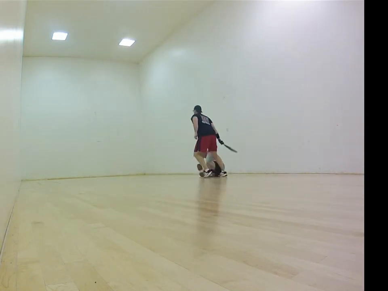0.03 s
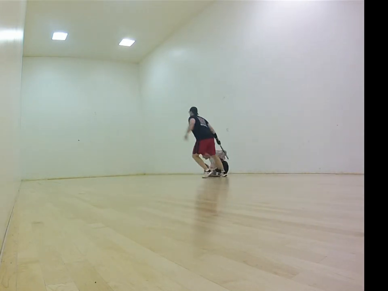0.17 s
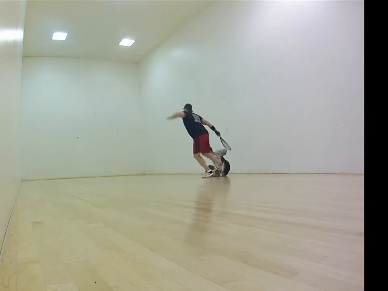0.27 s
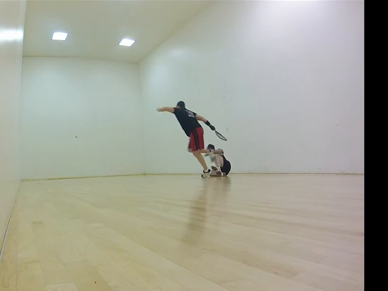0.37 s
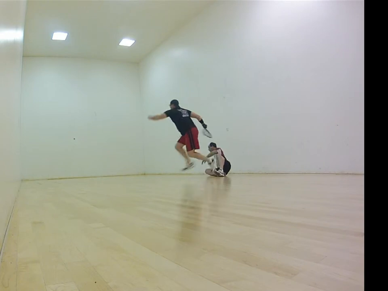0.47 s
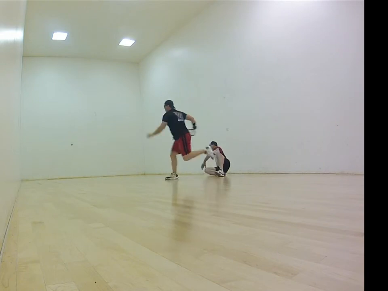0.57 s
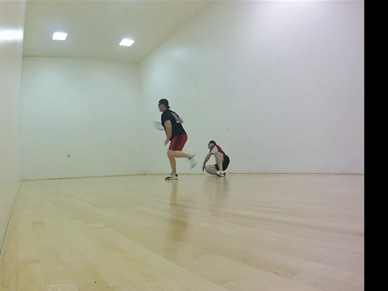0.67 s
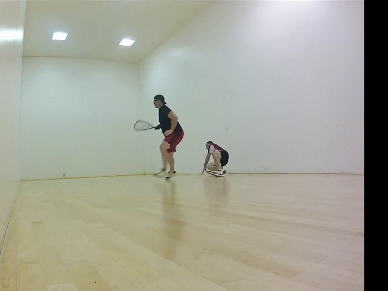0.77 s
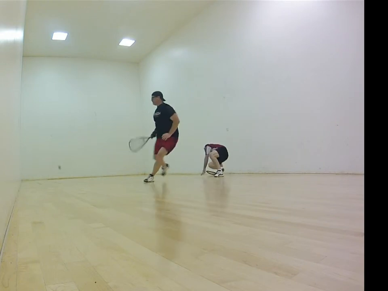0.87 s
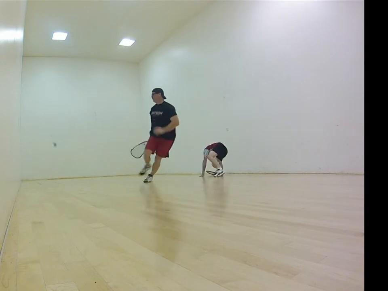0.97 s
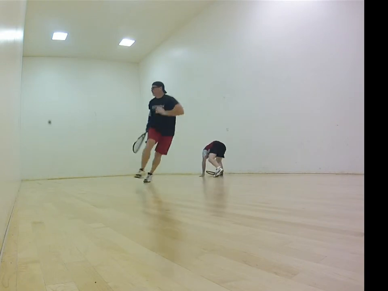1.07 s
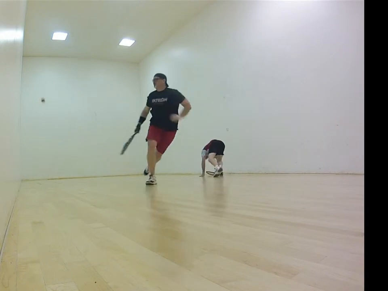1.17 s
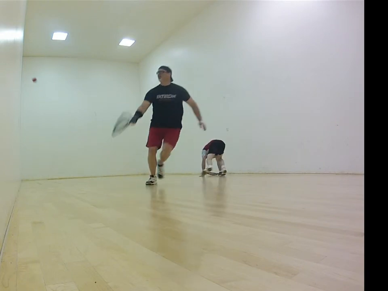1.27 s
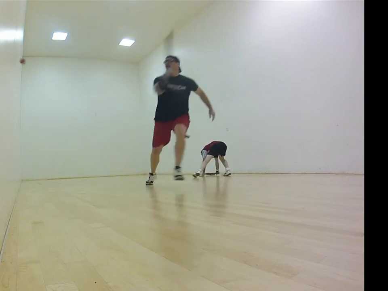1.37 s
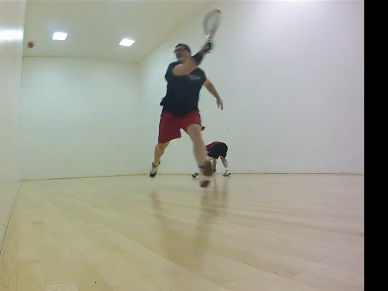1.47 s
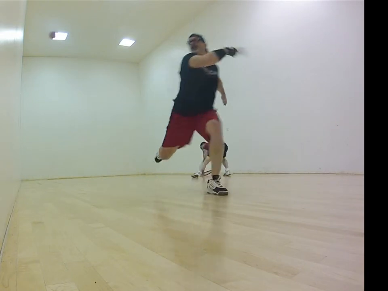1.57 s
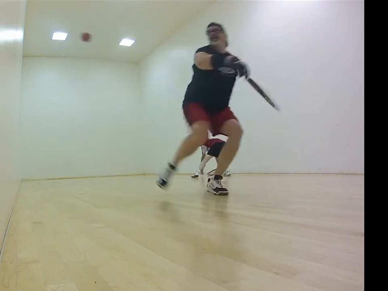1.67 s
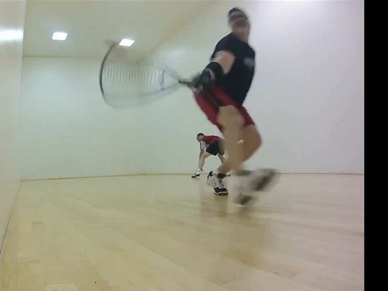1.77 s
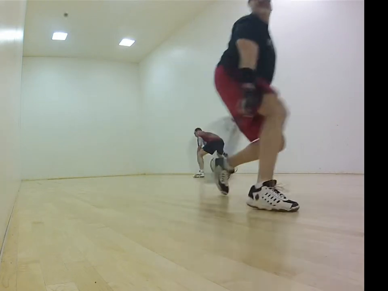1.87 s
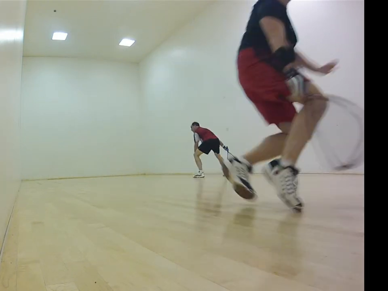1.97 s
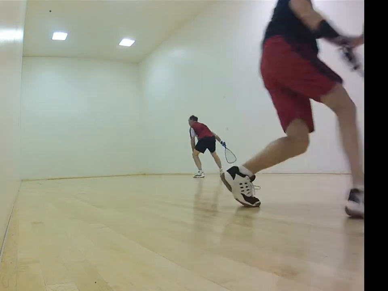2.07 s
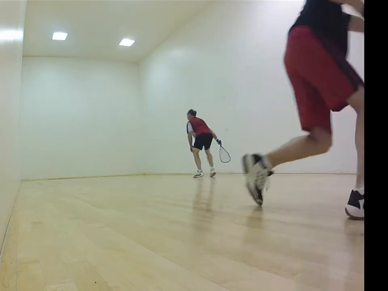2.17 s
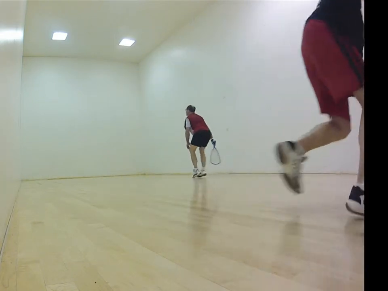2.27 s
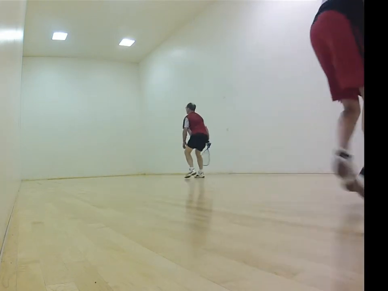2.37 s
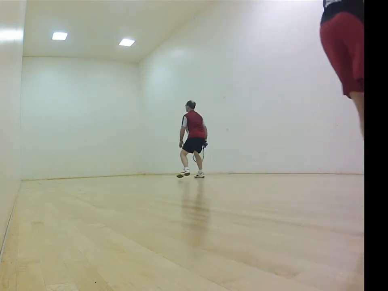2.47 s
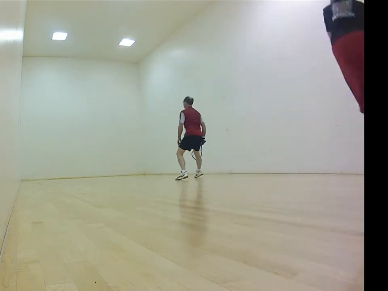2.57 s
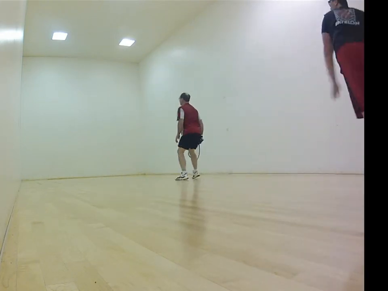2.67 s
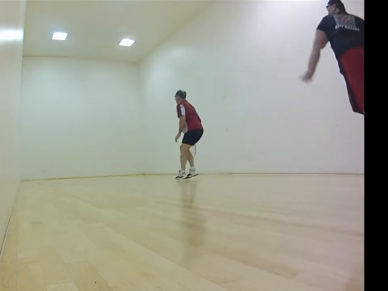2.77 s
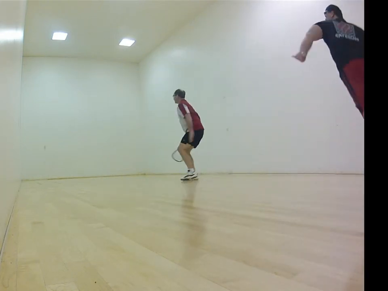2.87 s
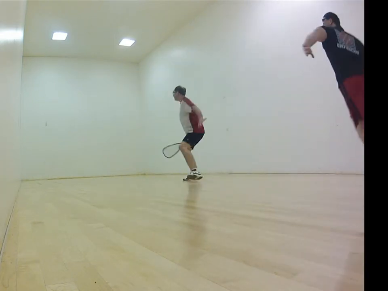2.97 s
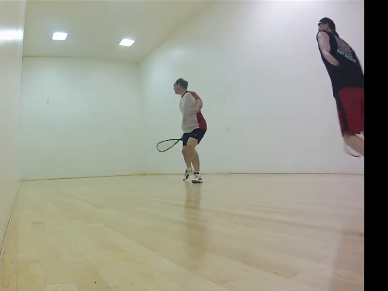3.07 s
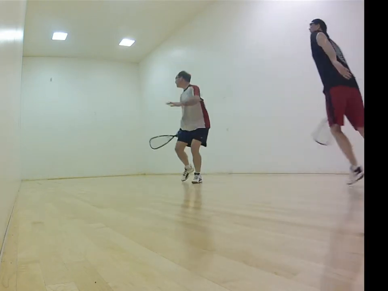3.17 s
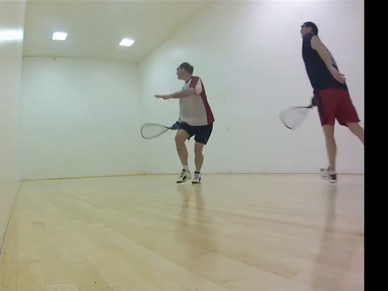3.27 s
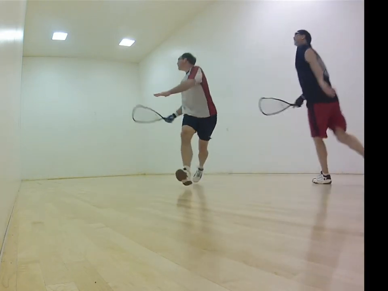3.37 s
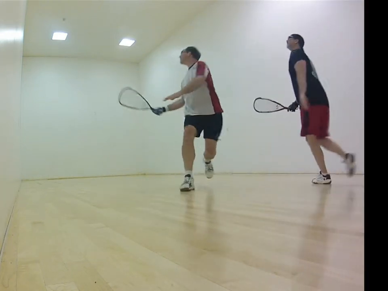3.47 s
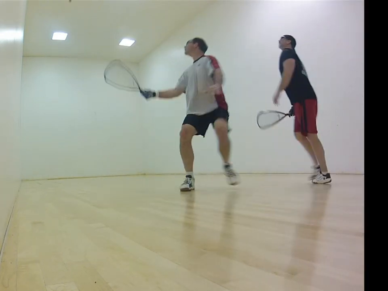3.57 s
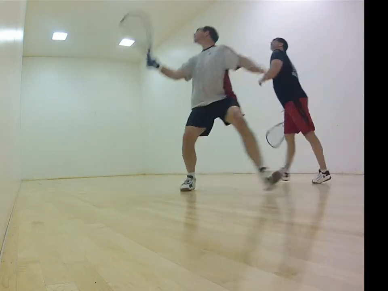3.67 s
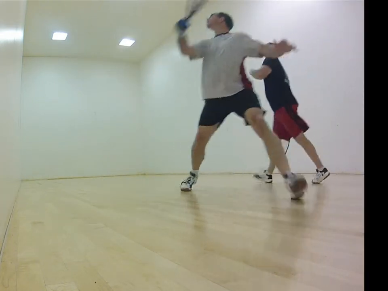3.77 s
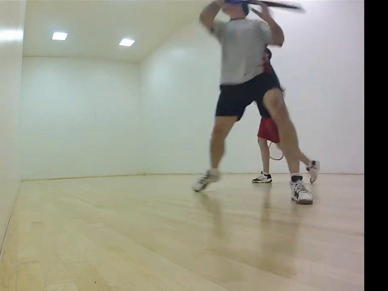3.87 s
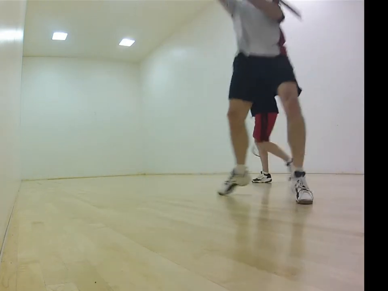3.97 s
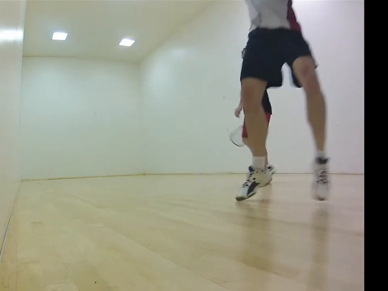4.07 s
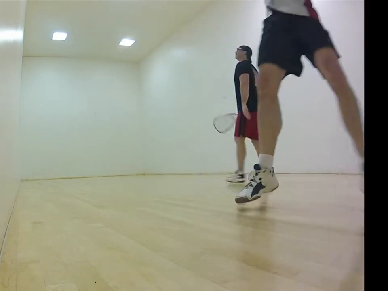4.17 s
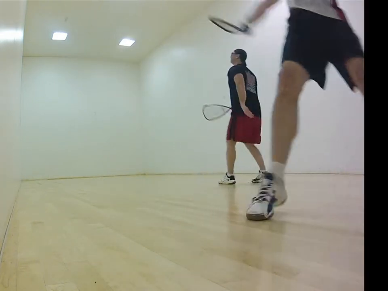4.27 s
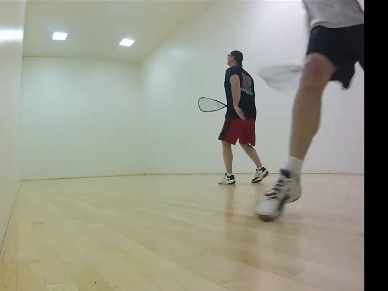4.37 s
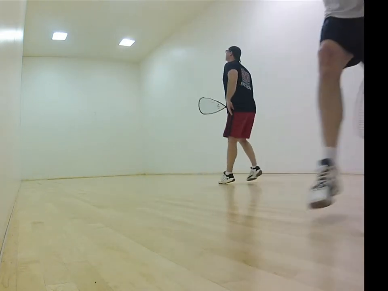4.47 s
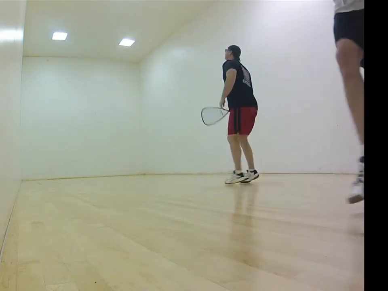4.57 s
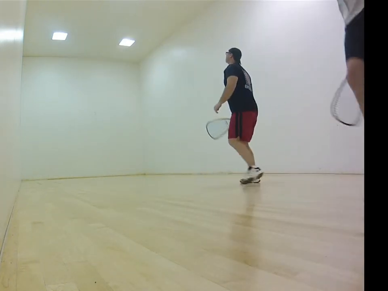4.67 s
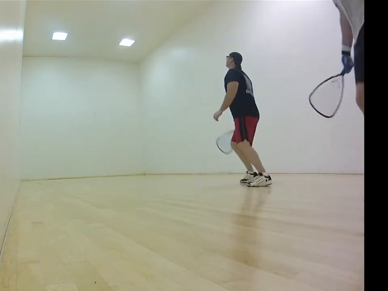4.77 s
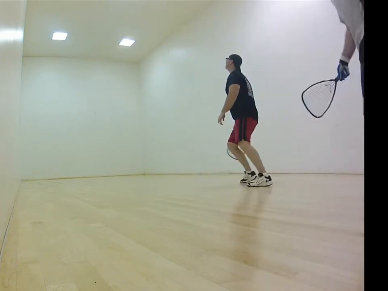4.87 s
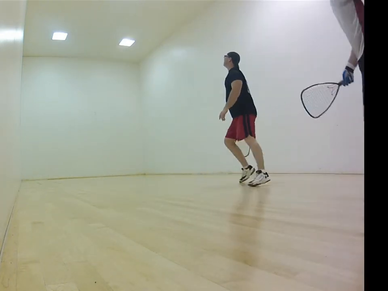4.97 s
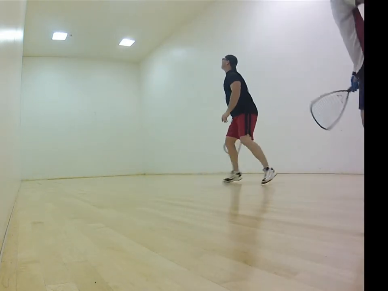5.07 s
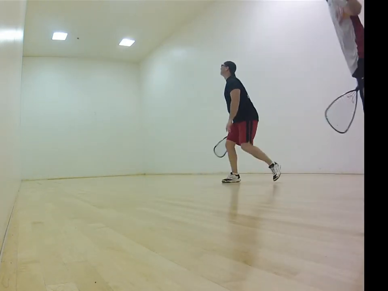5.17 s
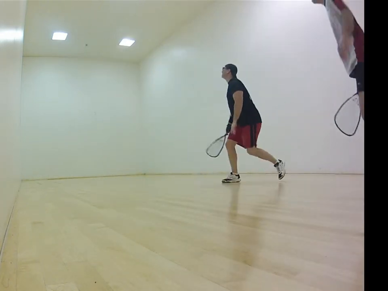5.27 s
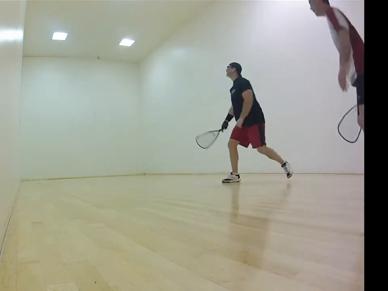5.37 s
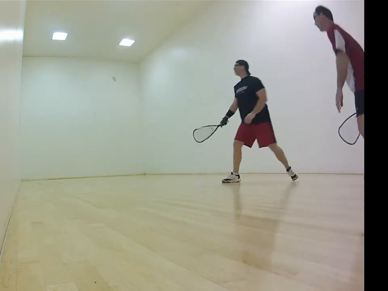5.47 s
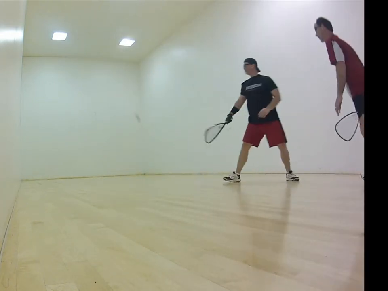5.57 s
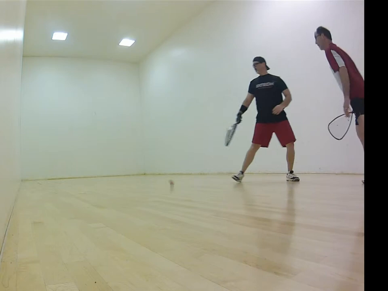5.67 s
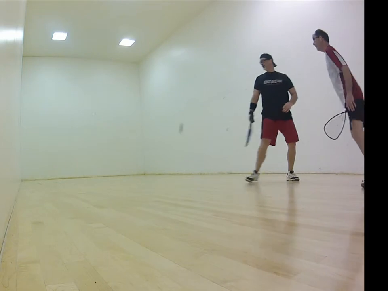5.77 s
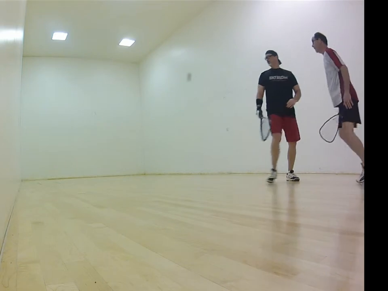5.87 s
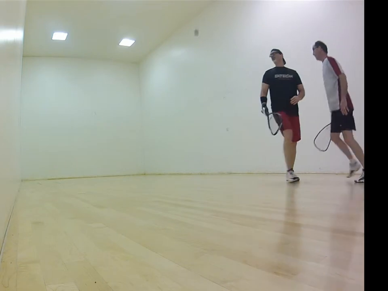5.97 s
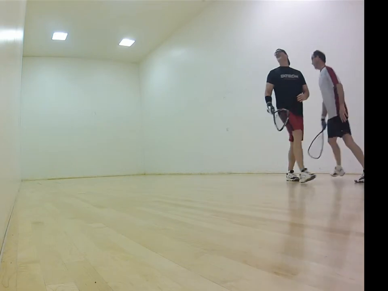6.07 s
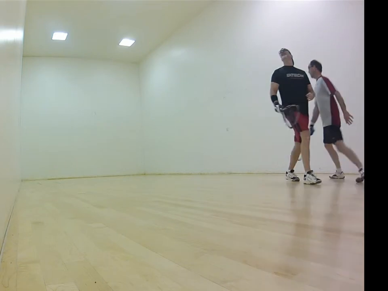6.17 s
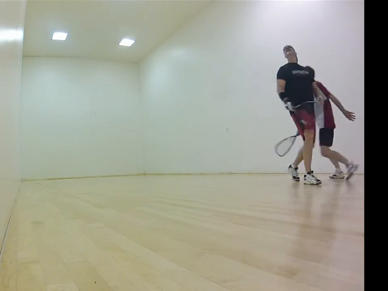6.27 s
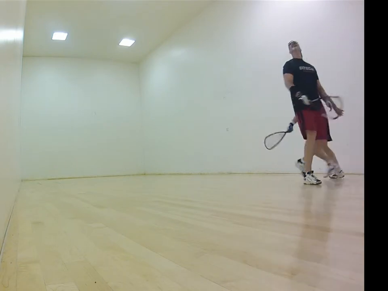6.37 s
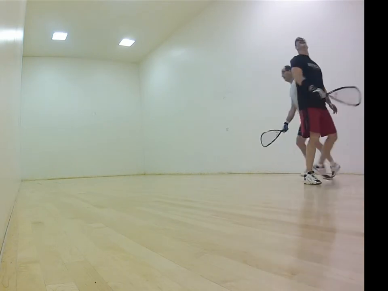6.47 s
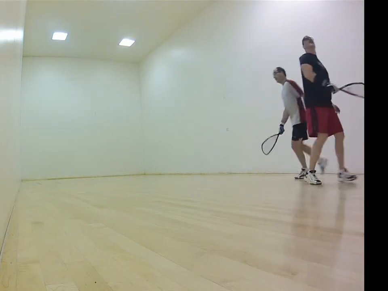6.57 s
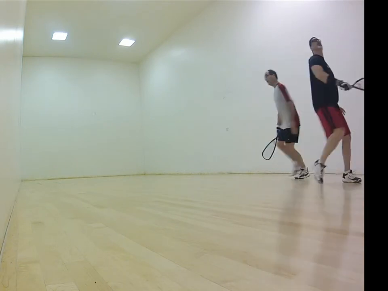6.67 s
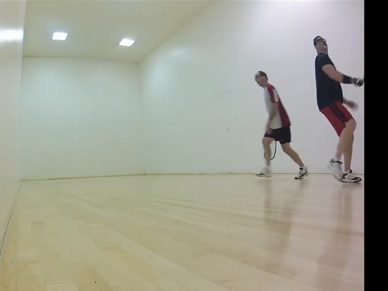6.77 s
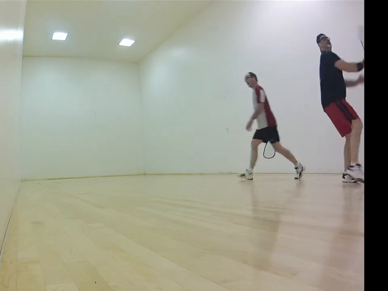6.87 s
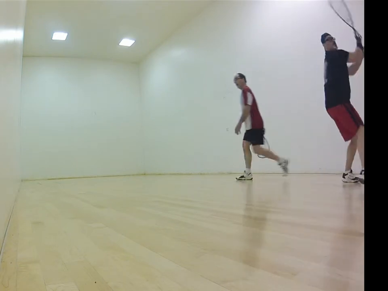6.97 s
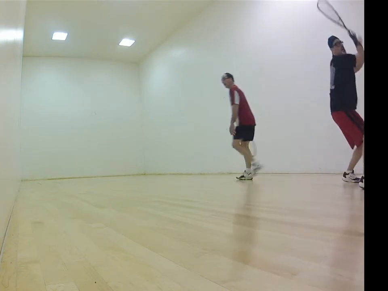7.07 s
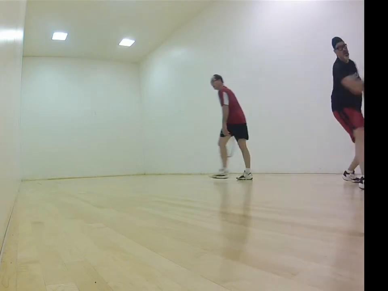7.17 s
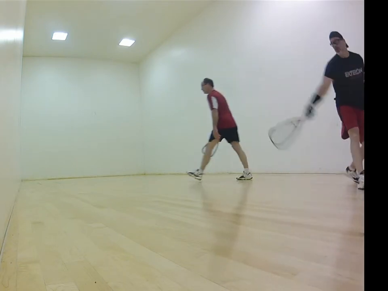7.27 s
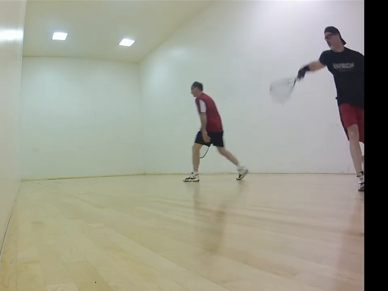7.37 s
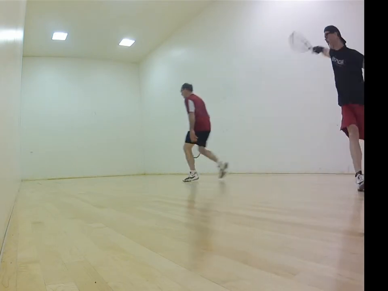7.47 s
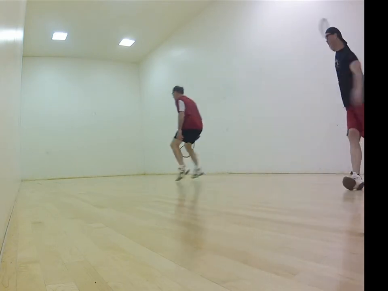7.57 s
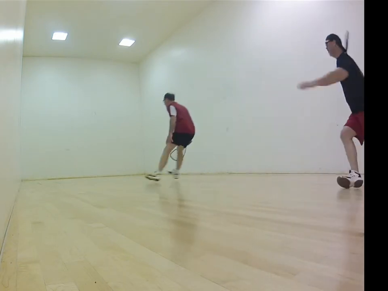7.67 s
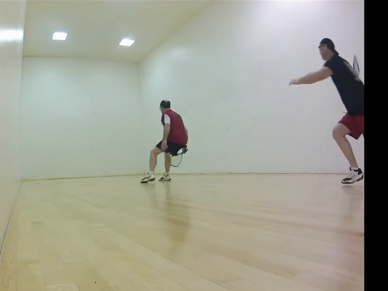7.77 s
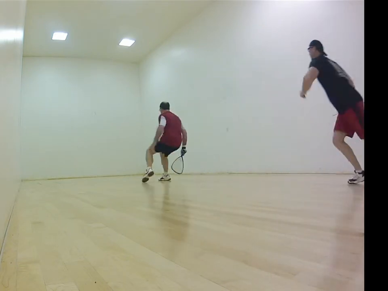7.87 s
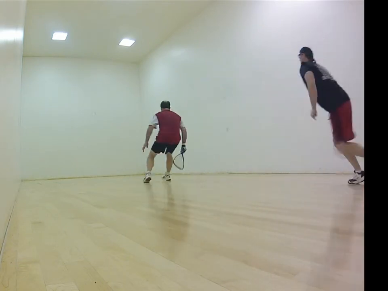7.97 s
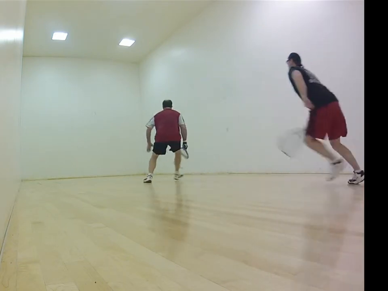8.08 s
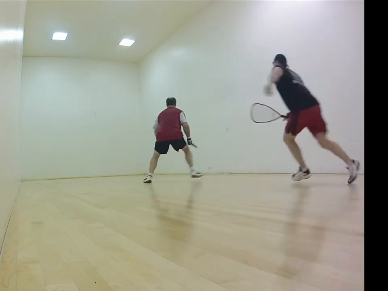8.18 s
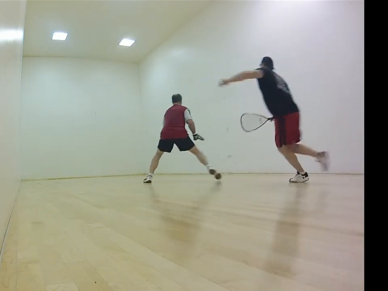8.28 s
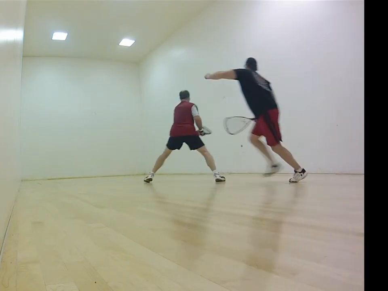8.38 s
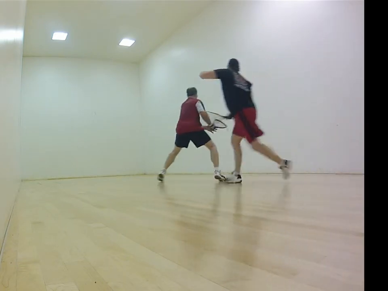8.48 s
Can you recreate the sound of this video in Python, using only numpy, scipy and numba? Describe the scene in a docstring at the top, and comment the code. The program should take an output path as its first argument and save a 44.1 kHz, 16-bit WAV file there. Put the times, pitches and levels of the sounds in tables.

```python
"""A hollow rubber ball pings off racquets, walls and floor in a rally on a bare, very live court.
Each impact excites the ball's air cavity and shell. Footfalls drive the sprung boards, soles squeak by
stick-slip friction, wooden panels boom and racquets swish, over the low noise of the ventilation.
Every blow reverberates for about three seconds. A small camera on the floor picks it up: its gain
ducks after loud blows, it overloads, and its slow converter mirrors the sound into the treble."""
import sys
import numpy as np
from scipy import signal
from scipy.fft import rfft, irfft, next_fast_len
from scipy.io import wavfile
from numba import njit

SR = 44100
rng = np.random.default_rng(int(sys.argv[2]) if len(sys.argv) > 2 else 0)


def put_to_file(sound):
    """Save the sound as 16-bit audio at rate SR, in the file named by the first command-line argument."""
    columns = np.atleast_2d(sound).T  # one column per channel
    safe = np.clip(columns, -1, 1)
    whole_steps = np.round(safe * 32767)
    wavfile.write(sys.argv[1], SR, whole_steps.astype(np.int16))


N = 376605


def from_db(db):
    """Amplitude ratio of a level in decibels."""
    return 10 ** (np.asarray(db) / 20)


def seconds(length_s):
    """A uniformly sampled time axis."""
    return np.arange(int(length_s * SR)) / SR


def decay(t, t60_s):
    """Exponential damping: 60 dB are lost in t60_s."""
    return np.exp(-np.log(1000) * t / t60_s)


def mode(t, hz, t60_s):
    """Impulse response of a damped harmonic oscillator."""
    return np.sin(2 * np.pi * hz * t) * decay(t, t60_s)


def on_bins(hz, values, size):
    """A curve interpolated over log frequency onto the bins of a Fourier transform."""
    bins_hz = np.maximum(np.fft.rfftfreq(size, 1 / SR), 1)
    return np.interp(np.log(bins_hz), np.log(hz), values)


def coloured_noise(spectrum, size):
    """Spectral shaping: white noise filtered by (frequency_hz, level_db) points, scaled to rms 1."""
    padded = next_fast_len(size)
    gain = from_db(on_bins(*np.transpose(spectrum), padded))
    noise = irfft(rfft(rng.standard_normal(padded)) * gain, padded)[:size]
    return noise / noise.std()


# spectrum of the ball's crack and the soles' slap and rub: frequency_hz, level_db
CONTACT_SPECTRUM = [(300, -13), (1000, 10.5), (1700, 1), (2200, 2.5), (3000, 3), (4000, 3.5), (5500, -6.5)]

def contact_noise(envelope):
    """Broadband contact noise: a burst is whitened to remove chance pitches, then coloured."""
    size = len(envelope)
    noise = rng.standard_normal(size) * envelope
    for _ in range(4):
        bins = rfft(noise, 2 * size)
        noise = irfft(bins / (np.abs(bins) + 1e-12))[:size]
    colour = from_db(on_bins(*np.transpose(CONTACT_SPECTRUM), 2 * size))
    noise = irfft(rfft(noise, 2 * size) * colour)[:size]
    return noise * np.linalg.norm(envelope) / np.linalg.norm(noise)


def cavity_ping(t, cavity_hz, hardness_db, squash=0.11, rebound_s=0.0037, lag_s=0.0012):
    """Cavity resonance: the pitch rises as the ball springs back; a hard blow chokes it sooner."""
    pitch_hz = cavity_hz * (1 - squash * np.exp(-t / rebound_s))
    phase = 2 * np.pi * np.cumsum(pitch_hz) / SR
    swell_s = 0.0023 * 2 ** (-hardness_db / 35.5)
    progress = np.maximum(t - lag_s, 0) / swell_s
    envelope = (progress * np.exp(1 - progress)) ** 3
    overtone = from_db(-26 + .5 * hardness_db) * np.sin(1.962 * phase)
    return from_db(-4.5) * envelope * (np.sin(phase) + overtone)


# the ball's higher shell modes: frequency_hz, level_db, t60_s
SHELL_MODES = [(937, -11, 0.017), (2265, -25, 0.01), (2800, -28, 0.022)]
# ball hits, and stray pings that stand out of the court's echo:
# start_s, level_db, distance_m, cavity_hz, hardness_db
BALL_PINGS = [(-0.3, 16.5, 5.5, 787, -2.5), (0.1245, 7.5, 3.4, 825, 6.5), (0.141, 11, 6.7, 656, 11.5),
              (0.277, 13.5, 14, 834, 1.5), (0.356, 7, 2.8, 894, -10), (0.54, 7.5, 20, 640, -2),
              (0.648, 9, 4.7, 605, -13), (0.664, 16, 15, 700, -7), (0.895, 6, 3, 743, -12),
              (0.962, 5, 4.1, 658, -35), (1.251, 2, 3.6, 697, -32), (1.859, 10.5, 3.6, 724, -18.5),
              (2.0, 2, 3.5, 933, -5), (2.08, 10, 33, 866, -4.5), (2.163, 10, 23, 677, 5),
              (2.64, 5, 5.9, 830, -1.5), (2.88, 5, 4.6, 880, -3.5), (4.185, 11.5, 1, 812, -7),
              (4.252, 6.5, 16, 806, -6.5), (4.315, 7.5, 13, 873, -8.5), (4.42, 6, 4.4, 715, -8),
              (4.597, 6.5, 4.3, 833, -12), (4.7305, 18.5, 2.44, 844, -12.5), (4.765, 12, 6, 760, -9),
              (4.985, 5, 9.5, 750, -3.5), (5.2135, -1, 2.4, 770, -13), (5.2995, -0.5, 1.3, 750, -14),
              (5.7918, 6, 1.75, 902, -10.5), (5.97, 8, 16, 905, -6), (6.0, -2, 4.9, 629, -30),
              (7.3308, 17, 0.67, 810, -0.5), (7.395, 15, 3.5, 823, 1), (7.465, 13, 10, 855, -3.5),
              (7.5585, 15, 7.2, 703, -3), (7.6095, 6.5, 1.8, 820, -7), (7.772, 14, 2.1, 884, -19),
              (7.878, 7, 2.8, 892, -18), (8.055, 8, 9.8, 694, 1), (8.427, 0.5, 2.3, 855, -3)]

def ball_ping(cavity_hz, hardness_db):
    """Elastic impact excites shell and cavity; a harder blow loads faster, thumps and cracks more."""
    t = seconds(0.26)
    thump = from_db(1.5 + 0.51 * hardness_db) * mode(t, hz=285, t60_s=0.013)
    wobble = from_db(-6) * mode(t, hz=600, t60_s=0.0085)  # the rubber wall swings in and out
    ping = cavity_ping(t, cavity_hz, hardness_db)
    shell = sum((-1) ** k * from_db(db) * mode(t, hz, t60_s)
                for k, (hz, db, t60_s) in enumerate(SHELL_MODES))
    crack = 0.26 * from_db(hardness_db) * contact_noise(decay(t, t60_s=0.016))
    contact_s = 0.00086 * 2 ** (-hardness_db / 47)
    loading = 1 - np.exp(-(t / contact_s) ** 2)
    return (thump + wobble - ping + shell + crack) * loading


# thuds on the floorboards, mostly steps, and a stomp's quick echoes:
# start_s, level_db, distance_m, board_hz, slap_db
FLOOR_THUDS = [(-0.2, 7, 6, 175, -6), (0.22, 10, 14, 192, -5), (0.6635, 7.5, 1.7, 193, -11),
               (0.691, 1, 2.3, 144, -22), (0.716, -8, 0.78, 174, -28), (0.775, 4.5, 2.7, 153, -26),
               (0.812, -2, 1.05, 157, -32), (1.609, -0.5, 2.9, 187, -15), (1.638, 1, 1.03, 135, -11),
               (1.677, -3, 2, 133, -31), (1.712, -8, 3.1, 133, -15), (1.8585, 2, 0.51, 255, -9),
               (1.9185, 1, 0.44, 187, -11), (2.09, 10, 30, 171, -31), (2.1735, -3.5, 0.69, 233, -21),
               (2.305, 4.5, 1.8, 160, -26), (2.338, -8, 1.6, 149, -28), (2.36, -4, 3, 66, -28),
               (2.405, -2.5, 2.2, 98, -20), (2.655, 3.5, 9.5, 211, -34), (2.95, -2.5, 2.3, 279, -15),
               (3.552, -3.5, 1.9, 90, -16.5), (3.87, -8, 2.4, 135, -20), (3.9105, 1.5, 1.1, 220, -13),
               (4.32, -21, 4.9, 109, -7), (4.7065, 2.5, 0.67, 249, -8), (4.719, -1, 1.4, 230, -4),
               (5.21, -12, 8, 112.4, -21), (5.7905, -5.5, 0.93, 235, -10), (6.7, -21, 1.3, 175, -16),
               (7.01, -9.5, 3.7, 153, -7), (7.6965, 10, 3.4, 365, -17), (7.71, 10.5, 4.8, 313, -16),
               (7.72, -1.5, 1.3, 189, -20), (7.744, -1.5, 1.4, 240, -14), (7.766, 1, 1.7, 277, -24),
               (7.877, 4.5, 9.1, 182, -11), (8.155, -11.5, 0.66, 163, -24)]

def floor_thud(board_hz, slap_db, ordinary_step_hz=198, ring_cycles=4.93, heel_s=0.00087):
    """Damped vibration of sprung boards under a slapping sole; lower thuds boom more and ring longer."""
    t = seconds(0.086)
    boards = mode(t, board_hz, t60_s=ring_cycles / board_hz)
    knock = from_db(-8) * mode(t, hz=430, t60_s=0.014)
    octaves = np.log2(board_hz / ordinary_step_hz)
    boom = from_db(-9.5 - 15.5 * octaves) * mode(t, hz=66, t60_s=0.019)
    slap = 0.52 * from_db(slap_db) * contact_noise(decay(t, t60_s=0.034))
    loading = 1 - np.exp(-t / heel_s)
    return (2.14 * (boards - knock - boom) + slap) * loading


# relative spectral density of the ventilation: frequency_hz, level_db
VENT_SPECTRUM = [(20, 11), (55, -5), (130, 1.5), (300, -7), (600, -8), (1500, -36), (5000, -55)]

def ventilation(level_db=-26):
    """Stationary noise with most of its power in the bass."""
    return from_db(level_db) * coloured_noise(VENT_SPECTRUM, N)


# rubber soles slipping: start_s, level_db, distance_m, pitch_hz, glide_octaves, roughness (0-1)
SOLE_SLIPS = [(0.165, -5, 6, 2290, -0.99, 0.87), (0.24, -3, 4.2, 3200, 0.36, 0.76),
              (1.426, -19, 6.2, 2680, 0.22, 0.2), (1.427, -17.5, 6, 5010, 0.2, .9),
              (1.449, -26, 5.6, 5070, -.1, .4), (1.465, -19, 3.6, 2740, 0.34, 0.4),
              (2.174, -6, 0.45, 3190, -0.25, 0.46), (2.1785, -7, 0.49, 4090, 0.47, 0.6),
              (2.258, -6.5, 4.6, 4184, 0.24, 0.5), (4.318, -22, 1.5, 4150, -0.31, 0.24),
              (4.7045, -19.5, 0.65, 3580, -0.56, 0.97), (5.1995, -12.5, 5.3, 2990, 0.3, 0.8),
              (6.71, -12, 8.3, 3923, -0.26, 0.2), (6.712, -21, 3.5, 2570, -0.25, 0.23),
              (6.773, -25, 2.1, 2800, 0.2, 0.43), (6.945, -25, 5, 1560, 0.17, .5),
              (7.312, -18, 3.2, 4850, 0, .9), (7.572, -16, 2.8, 4870, 0.72, 0.66),
              (7.581, -12, 2.7, 3000, -0.28, .8), (7.591, -13, 2.4, 4300, -0.32, 0.7),
              (7.608, -20.5, 1.2, 5270, 0, 0.9)]

def squeak(pitch_hz, glide_octaves, roughness, clean_slip_s=0.01277, arch_octaves=0.081):
    """Stick-slip friction gives an arching tone; a rough slip wavers, chatters, rubs and ends sooner."""
    t = seconds(.06)
    jitter_spectrum = [(100, 3.5), (500, 24), (2500, -15.5)]
    waver_octaves = 0.093 * roughness * coloured_noise(jitter_spectrum, len(t))
    grip = coloured_noise(jitter_spectrum, len(t))
    progress = np.minimum(t / clean_slip_s * 2 ** roughness, 1)
    pressure = np.sin(np.pi * progress)  # the sole catches and lets go
    octaves = glide_octaves * (progress - .5) + arch_octaves * (pressure - 1) + waver_octaves
    phase = 2 * np.pi * np.cumsum(pitch_hz * 2 ** octaves) / SR
    tone = np.sin(phase) + from_db(-18) * np.sin(2 * phase)
    chatter = from_db(4 * roughness * (grip - .5))
    rub = from_db(-5) * roughness * contact_noise(pressure)
    return tone * pressure * chatter + rub


# a wooden panel's modes: pitch_ratio, level_db
PANEL_MODES = [(0.83, 0.5), (1, 3), (1.13, -32), (1.28, 4.5), (1.45, -4.5), (1.71, -16)]
# heavy landings and shoves: start_s, level_db, distance_m, t60_s, pitch_hz
PANEL_BLOWS = [(0.664, -15.5, 0.39, 1, 127.3), (1.637, -20.5, 0.5, 0.28, 127),
               (2.3, -18.5, 0.44, 1.6, 134.8), (3.55, -25.5, 1.1, 0.61, 113.2),
               (7.87, -19, 0.64, 1.03, 130)]

def panel_boom(t60_s, pitch_hz, swell_s=0.0031):
    """Modal superposition: a big wooden panel takes the weight and rings in several low modes."""
    t = seconds(.8)
    modes = sum((-1) ** k * from_db(db) * mode(t, ratio * pitch_hz, t60_s)
                for k, (ratio, db) in enumerate(PANEL_MODES))
    return .5 * modes * (1 - np.exp(-t / swell_s))


# racquets sweeping close by: start_s, level_db, distance_m, pitch_hz
RACQUET_SWINGS = [(4.145, -27, 0.99, 486), (7.294, -29, 0.43, 660)]

def racquet_swish(pitch_hz, length_s=0.049, width_octaves=0.38):
    """Aerodynamic noise: air rushes through the strings, louder as the racquet gathers speed."""
    t = seconds(length_s)
    band = [(pitch_hz * 2 ** (widths * width_octaves), db)
            for widths, db in [(-3, -30), (-1, -8), (0, 0), (1, -10), (4, -45)]]
    return coloured_noise(band, len(t)) * np.sin(np.pi * (t / length_s) ** 2)


# the court's reverberation time: frequency_hz, t60_s
COURT_DECAY = [(50, 3.3), (160, 2.44), (400, 3.05), (900, 3.4), (2500, 4.12), (5000, 2.48)]

def court_response(density_per_s3=1.5e6, build_s=0.0068, bunching_db=1.67, flutter_s=.0356):
    """Reverberation: echo density grows with time squared; a flutter runs between floor and ceiling."""
    t = seconds(3)
    echo_chance = np.clip(density_per_s3 * t ** 2 / SR, 1e-4, 1)
    echoes = rng.standard_normal(len(t)) * (rng.random(len(t)) < echo_chance) / np.sqrt(echo_chance)
    bunching = coloured_noise([(15, -26), (40, -6), (120, 2.5), (400, -29.5)], len(t))
    echoes *= from_db(bunching_db * bunching)
    onset = 1 - np.exp(-(t / build_s) ** 2)
    spectrum = rfft(echoes * onset)
    centres_hz, t60s = np.transpose(COURT_DECAY)
    bands = [on_bins(centres_hz, weights, len(t)) for weights in np.eye(len(t60s))]
    wash = sum(irfft(spectrum * band, len(t)) * decay(t, t60_s) for band, t60_s in zip(bands, t60s))
    wash /= np.linalg.norm(wash)
    trip = int(flutter_s * SR)
    wash[trip::trip] += 0.073 * decay(t[trip::trip], t60_s=0.26)
    return wash


def in_court(events, source, responses, critical_distance_m=2.19):
    """Inverse distance law: the direct sound equals the reverberant field at the critical distance."""
    lead = SR // 2  # the rally is already under way at time zero
    out = np.zeros(lead + N + 4 * SR)
    for k, (start_s, level_db, distance_m, *shape) in enumerate(events):
        sound = from_db(level_db) * source(*shape)
        heard = signal.oaconvolve(sound, responses[k % len(responses)])
        heard[:len(sound)] += critical_distance_m / distance_m * sound
        start = lead + round(start_s * SR)
        out[start:start + len(heard)] += heard
    return out[lead:lead + N]


def scene():
    """Superposition of ball, floor, soles, panels and racquets over the ventilation."""
    responses = [court_response() for _ in range(10)]  # each spot has its own pattern of echoes
    background = ventilation()
    sources = [(BALL_PINGS, ball_ping), (FLOOR_THUDS, floor_thud), (SOLE_SLIPS, squeak),
               (PANEL_BLOWS, panel_boom), (RACQUET_SWINGS, racquet_swish)]
    rally = sum(in_court(events, source, responses) for events, source in sources)
    return (background + rally)[None]


@njit
def gain_reduction_db(excess_db, attack_s, release_db_per_s):
    """Envelope follower: it chases the excess level quickly and lets go at a steady rate."""
    attack, release = 1 / (attack_s * SR), release_db_per_s / SR
    out, held = np.zeros(len(excess_db)), 0.
    for i in range(len(out)):
        held = max(held + attack * max(excess_db[i] - held, 0.) - release, 0.)
        out[i] = held
    return out


def gain_control(x, threshold_db=-11.5, sense_hz=350, deepest_db=28):
    """Dynamic compression: loud sound is turned down, with the bass heeded less."""
    sensed = signal.sosfilt(signal.butter(2, sense_hz, "high", fs=SR, output="sos"), x)
    level_db = 20 * np.log10(np.abs(sensed) + 1e-9)
    excess_db = np.minimum(level_db - threshold_db, deepest_db)
    return x * from_db(-gain_reduction_db(excess_db, attack_s=0.0024, release_db_per_s=90))


def converter(x, band_hz=5500, rate_hz=12000):
    """Zero-order hold: weaker images of the band appear on both sides of the sampling rate."""
    narrow = signal.sosfilt(signal.butter(24, band_hz, fs=SR, output="sos"), x)
    mirrored = narrow * (1 + 2 * np.cos(2 * np.pi * rate_hz * np.arange(N) / SR))
    padded = next_fast_len(N)
    hold_droop = np.sinc(np.fft.rfftfreq(padded, 1 / SR) / rate_hz)
    return irfft(rfft(mirrored, padded) * hold_droop, padded)[:N]


def record(dry, mic_low_hz=62, cutoff_hz=15300):
    """Band limiting and saturation: the camera loses deep bass, ducks, clips and cuts the top."""
    picked_up = signal.sosfilt(signal.butter(2, mic_low_hz, "high", fs=SR, output="sos"), dry[0])
    overloaded = np.clip(gain_control(picked_up), -1.2, 1.2)
    converted = converter(overloaded)
    soft_clipped = .93 * converted / (1 + converted ** 12) ** (1 / 12)
    top_cut = signal.ellip(12, .1, 80, cutoff_hz, fs=SR, output="sos")
    return signal.sosfilt(top_cut, soft_clipped)[None]


dry = scene()
out = record(dry)
put_to_file(out)
```